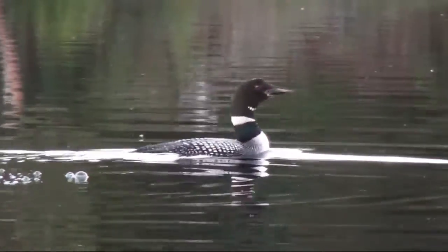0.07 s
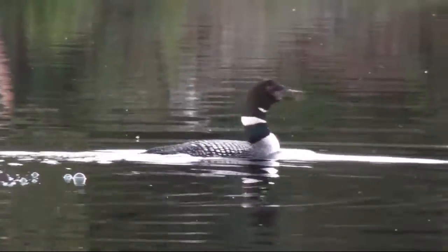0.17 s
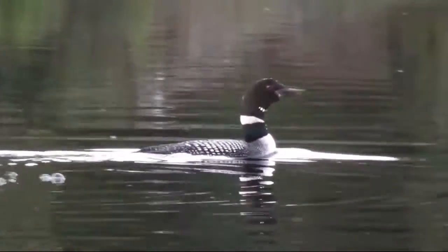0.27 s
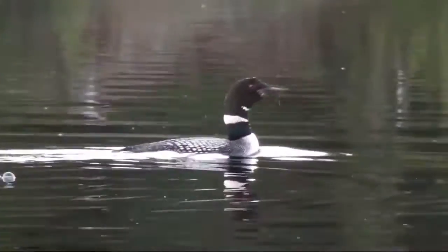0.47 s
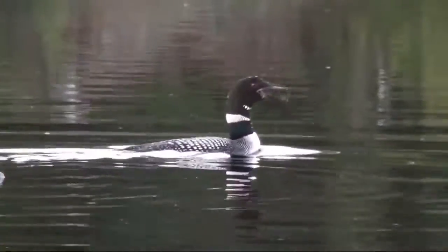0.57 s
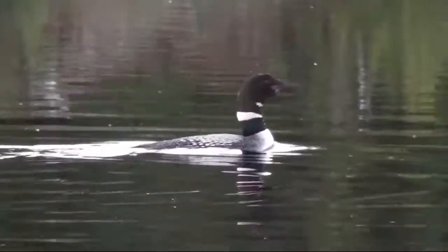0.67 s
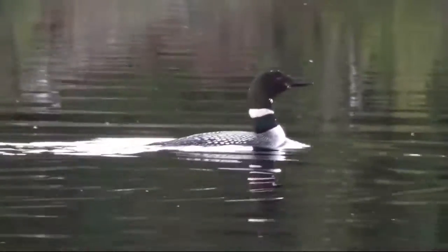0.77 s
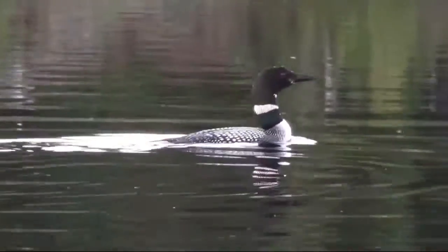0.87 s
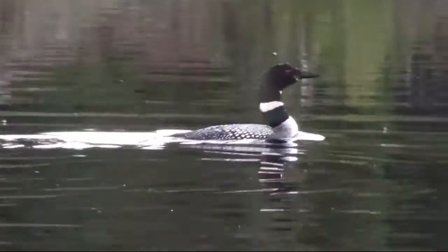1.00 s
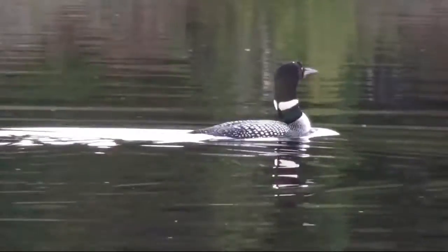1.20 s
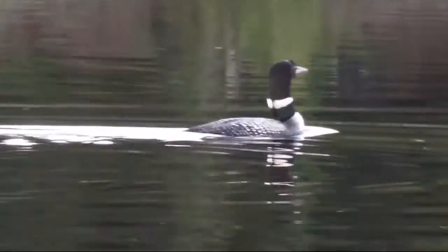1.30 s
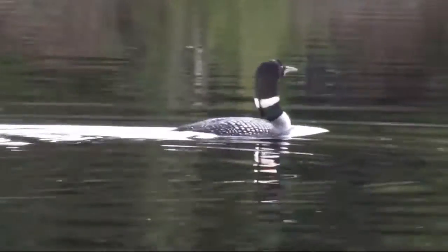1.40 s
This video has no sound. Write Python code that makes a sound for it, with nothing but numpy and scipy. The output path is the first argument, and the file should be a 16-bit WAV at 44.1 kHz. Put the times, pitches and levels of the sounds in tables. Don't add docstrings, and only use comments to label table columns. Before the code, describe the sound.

One clear, flute-like loon tremolo, fairly close and near the centre, leaps from a low note to a wavering high laugh, then stops. Dull, diffuse echoes linger over very quiet outdoor lake air and a faint distant hum.

```python
import sys
import numpy as np
from scipy import signal
from scipy.fft import rfft, irfft
from scipy.io import wavfile
from scipy.ndimage import uniform_filter1d, map_coordinates

SR = 44100
rng = np.random.default_rng(int(sys.argv[2]) if len(sys.argv) > 2 else 0)


def volts(x):
    e = np.asarray(x, float) / 20
    return 10 ** e


def int16_out(signal):
    q = np.round(np.clip(np.atleast_2d(signal).T, -1, 1) * 32767)
    wavfile.write(sys.argv[1], SR, q.astype(np.int16))


N = 63945


def rms_one(x):
    return x / np.sqrt(np.mean(x ** 2) + 1e-20)


def in_time(rows):
    s, *columns = np.transpose(rows)
    t = np.arange(N) / SR
    return [uniform_filter1d(np.interp(t, s, c), size=300) for c in columns]


def at_hz(points, hz):
    table_hz, values = np.array(points)[:, 0], np.array(points)[:, 1]
    return np.interp(np.log(hz), np.log(table_hz), values)


def drift(rate_hz):
    r = np.exp(-2 * np.pi * rate_hz / SR)
    wander = signal.lfilter([1], [1, -2 * r, r * r], rng.standard_normal(2 * N))
    return rms_one(wander[N:])


def bump(centre_s, length_s, power):
    place = np.clip((np.arange(N) / SR - centre_s) / length_s, -.5, .5)
    return np.cos(np.pi * place).clip(0) ** power


def pan(db):
    return volts(db * np.array([[.5], [-.5]]))


def blend(mid, side, alike):
    return np.sqrt(1 + alike) * mid + np.sqrt(1 - alike) * side * [[1], [-1]]


def coloured(spectrum):
    # frequency in Hz, likeness of left and right (1 is identical).
    likeness = [(30, .6), (100, .75), (300, 0.95), (1000, 0.82), (10000, 0.94)]
    hz = np.fft.rfftfreq(N, 1 / SR) + 1
    mid, side = rfft(rng.standard_normal((2, N)))
    inside = (hz > spectrum[0][0]) * (hz < spectrum[-1][0])
    gain = volts(at_hz(spectrum, hz)) * inside
    return rms_one(irfft(gain * blend(mid, side, at_hz(likeness, hz)), N))


def lake_air():
    # frequency in Hz, level in dB per Hz.
    rumble = [(22, -16), (50, -14), (120, -4.5), (230, -1.5), (320, -16), (480, -7), (800, -10)]
    # frequency in Hz, level in dB per Hz.
    fine_hiss = [(700, -3.2), (1500, -2), (2500, -7), (3500, -9), (6000, -10.5), (11300, -9.5)]
    return volts(-58.5 + 2.1 * drift(1)) * coloured(rumble) + volts(-62.5) * coloured(fine_hiss)


def far_hum():
    centre_hz, width_hz = 478.8, 31
    edges = [centre_hz - width_hz / 2, centre_hz + width_hz / 2]
    band = signal.butter(2, edges, "band", fs=SR, output="sos")
    hum = rms_one(signal.sosfilt(band, rng.standard_normal(N)))
    return volts(-58.5) * bump(0.85, 0.93, 1.0) * hum


def shore(bird):
    # delay in seconds, level in dB.
    tree_returns = [(.015, -83), (.2, -87), (0.481, -84.5), (.54, -73), (.8, -77.5), (.95, -86.5),
                    (1.2, -89)]
    cut_hz, pan_db, alike = 1460, 7.5, 0.83
    earlier_s, earlier_db, earlier_pan_db = 1.2, -6.5, -9
    s, db = np.transpose(tree_returns)
    t = np.arange(2 * N) / SR
    late = db[-1] + (t - s[-1]) * (db[-1] - db[-2]) / (s[-1] - s[-2])
    shape = volts(np.where(t < s[-1], np.interp(t, s, db, left=-np.inf), late))
    mid, side = rng.standard_normal((2, 2 * N)) * shape
    response = blend(mid, side, alike) / np.sqrt(2)
    response = signal.sosfilt(signal.butter(2, cut_hz, fs=SR, output="sos"), response)
    echo = signal.fftconvolve(bird[None], response, axes=1)
    skip = int(earlier_s * SR)
    earlier = echo[:, skip:skip + N] * volts(earlier_db) * pan(earlier_pan_db)
    return echo[:, :N] * pan(pan_db) + earlier


def voice(hz, db, rows, orders, full_db, turn=0):
    # frequency in Hz, gain in dB.
    throat = [(930, 19.5), (1300, -8), (1520, 1.5), (2050, -2), (2300, -1.5), (3950, 0.5), (4620, 3.5),
              (4830, -12)]
    # frequency in Hz, level in dB per Hz.
    rasp_colour = [(100, -6), (1500, -4), (2600, 1.7), (3700, -13), (4600, 0.5), (6500, -3), (7700, -19.5),
                   (11200, 4)]
    jitter_hz, shimmer_db, breath_db = 2.7, 0.39, -40
    rasp_db, rasp_growth, rasp_pulse = -48, 0.9, 0.85
    flutter_db, fade_db_per_s, lag_s = 1.45, -12, 0.0015
    t = np.arange(N) / SR
    start_s, end_s = rows[0][0], rows[-1][0]
    on = (t > start_s) & (t < end_s)
    phase = 2 * np.pi * np.cumsum(hz + jitter_hz * drift(48)) / SR
    wobble_db = shimmer_db + 2 * bump(.175, .07, 1)
    db = db + wobble_db * drift(62)
    tone = volts(db) * np.sin(phase) * (1 + volts(breath_db) * drift(990))
    fade_db = fade_db_per_s * (t - (start_s + end_s) / 2)
    effort_db = np.interp(t - lag_s, t, db) - full_db
    for k, level_db, growth in orders:
        overtone_db = full_db + level_db + growth * effort_db + at_hz(throat, k * hz)
        overtone_db = overtone_db + flutter_db * drift(28) + fade_db / (k - 1)
        tone = tone + volts(overtone_db) * np.cos(k * phase + turn)
    pulsing = 1 + rasp_pulse * np.sin(phase)
    rasp = volts(rasp_db + rasp_growth * (db - full_db)) * pulsing * coloured(rasp_colour)[0]
    return on * (np.sqrt(2) * tone + rasp)


def call():
    # time in seconds, pitch in Hz, level in dB.
    low_note = [
        (.142, 440, -67),
        (0.154, 453.6, -53.5),
        (.192, 489, -47),
        (0.204, 602.8, -53.5),
        (.215, 648, -26),
        (0.236, 736.3, -21),
        (.252, 763.6, -19.5),
        (.277, 749, -26),
        (0.293, 740, -49.5),
    ]
    # time in seconds, pitch in Hz, level in dB.
    high_note = [
        (.281, 996.6, -50.5),
        (0.29, 978.7, -20.5),
        (0.309, 956.6, -21),
        (0.598, 974.6, -20),
        (.8, 945, -20.5),
        (.818, 932.4, -24.5),
        (.875, 982, -20),
        (.893, 954, -22),
        (0.939, 875, -57.5),
    ]
    # centre in seconds, length in seconds, pitch rise in Hz, swell in dB.
    quavers = [
        (0.352, .1, 222.5, 8.5),
        (.453, .1, 239.1, 10),
        (.553, .1, 239.9, 9.5),
        (0.654, .1, 232.5, 9),
        (.759, 0.094, 214, 8),
    ]
    # multiple of the pitch, level in dB at full effort, growth in dB per dB of effort.
    low_orders = [(2, 2.5, 1.84), (3, -9, 3), (4, -48.5, 1.8), (5, -54.5, 3), (6, -33.5, 1.5),
                  (7, -13.5, 3.5), (8, -26, 4.5), (12, -23, 3)]
    high_orders = [(2, -18, 2), (3, -45, 0.43), (4, -32.5, 1.77), (5, -28.5, 1.52), (6, -32.5, 1.5),
                   (7, -28, 3.4), (8, -46, 1.5), (9, -28.5, 1.5)]
    # time in seconds, left minus right in dB.
    bearing = [
        (.25, -0.5),
        (.335, -3),
        (.41, 0.9),
        (.55, 1),
        (.7, 1.34),
        (.86, 0.95),
    ]
    flat_top = 1.2
    hz, db = in_time(high_note)
    pan_db, = in_time(bearing)
    for s, length_s, rise_hz, swell_db in quavers:
        hz = hz + rise_hz * np.tanh(flat_top * bump(s, length_s, 2.0)) / np.tanh(flat_top)
        db = db + swell_db * np.tanh(flat_top * bump(s, length_s, 1.365)) / np.tanh(flat_top)
    low = voice(*in_time(low_note), low_note, low_orders, -19.5)
    high = voice(hz, db, high_note, high_orders, -10.5, turn=-0.76)
    gulp = volts(-44) * bump(.922, .045, 1.7) * np.sin(2 * np.pi * 610 * np.arange(N) / SR)
    return low + high + gulp, pan_db


def scene():
    bird, pan_db = call()
    return bird * pan(pan_db) + shore(bird) + far_hum() + lake_air()


def smear_detail(x):
    # frequency in Hz, share of random smear.
    smear = [(500, .01), (1500, 0.074), (2200, 0.14), (2900, 0.47), (4400, 0.35), (11000, 0.23)]
    # frequency in Hz, level in dB.
    side_gate = [(30, -98), (400, -83.5), (1000, -79.5), (2600, -72), (11000, -74.5)]
    hole_db, hole_depth_db = -63, -16
    side_share = 0.33
    hz, _, (mid, side) = signal.stft([x[0] + x[1], x[0] - x[1]], SR, "cosine", 2048)
    real, imag = rng.standard_normal((2, *mid.shape))
    share = at_hz(smear, hz + 1)[:, None]
    mid = mid * (1 + share * (real + 1j * imag)) / np.sqrt(1 + 2 * share ** 2)
    weak = uniform_filter1d(abs(mid), size=11, axis=0) < volts(hole_db) * abs(mid).max(axis=0)
    mid = mid * np.where(weak, volts(hole_depth_db), 1)
    side = side * (1 + side_share * (imag + 1j * real)) / np.sqrt(1 + 2 * side_share ** 2)
    gate = volts(at_hz(side_gate, hz + 1))[:, None]
    side = side * (uniform_filter1d(abs(side), size=5, axis=0) > gate)
    mid, side = signal.istft([mid, side], SR, "cosine", 2048)[1][:, :N]
    return np.array([mid + side, mid - side]) / 2


def band_limit(x):
    return signal.sosfilt(signal.butter(12, 11370, fs=SR, output="sos"), x)


def record(dry):
    recorder_hz = 48000
    nearest = np.round(np.arange(N) * recorder_hz / SR) * SR / recorder_hz
    x = np.array([map_coordinates(c, [nearest], order=5, mode="nearest") for c in dry])
    top_cut = signal.cheby2(14, 60, 11500, fs=SR, output="sos")
    x = signal.sosfilt(top_cut, smear_detail(x))
    return band_limit(x)


dry = scene()
out = record(dry)
int16_out(out)
```